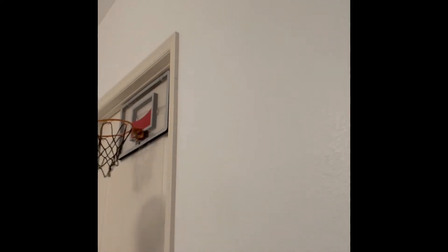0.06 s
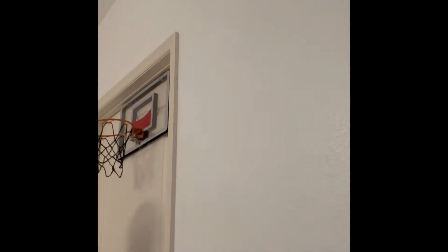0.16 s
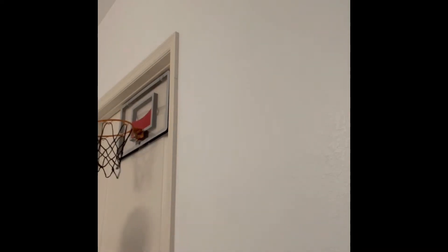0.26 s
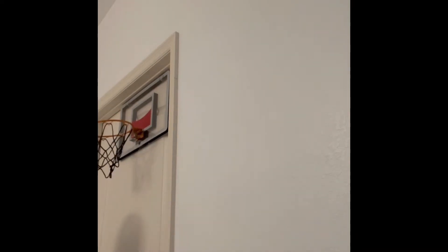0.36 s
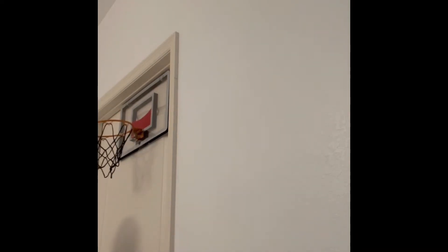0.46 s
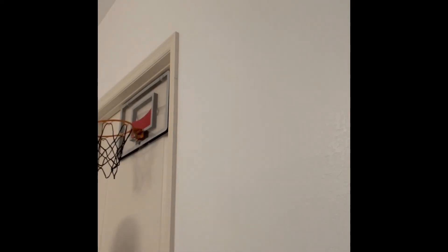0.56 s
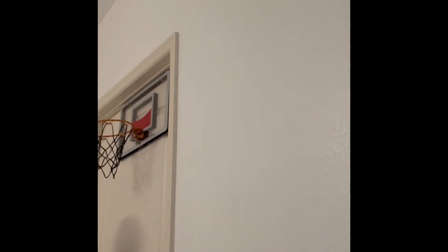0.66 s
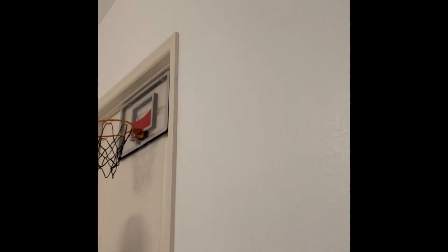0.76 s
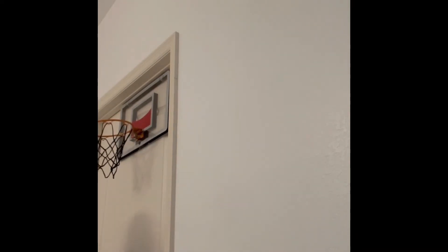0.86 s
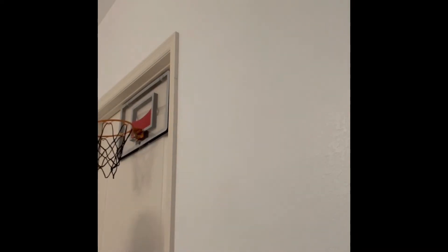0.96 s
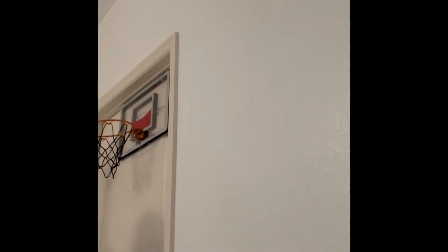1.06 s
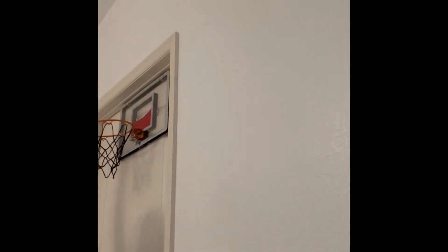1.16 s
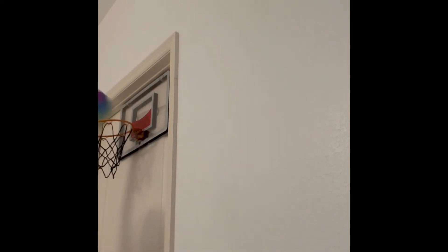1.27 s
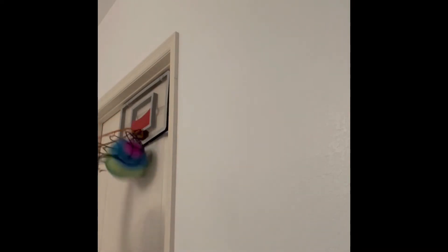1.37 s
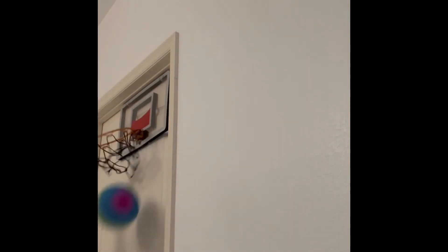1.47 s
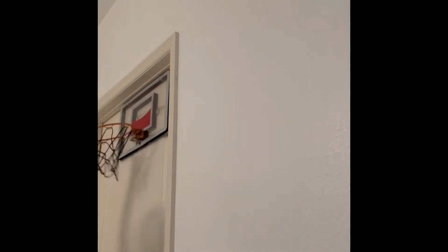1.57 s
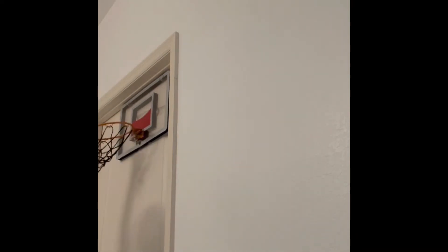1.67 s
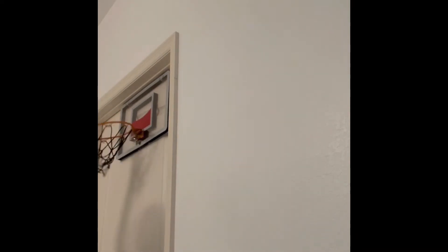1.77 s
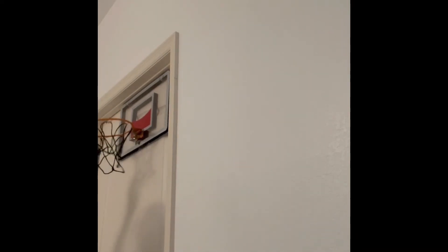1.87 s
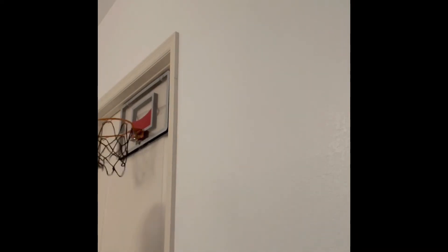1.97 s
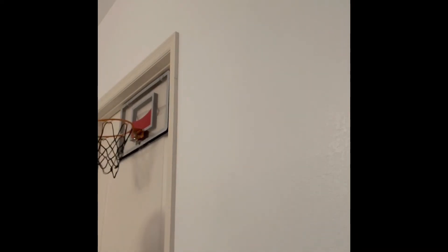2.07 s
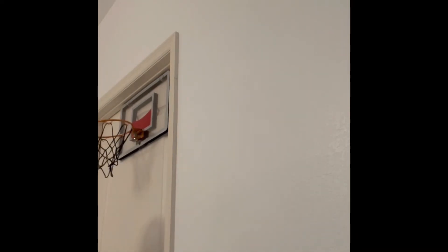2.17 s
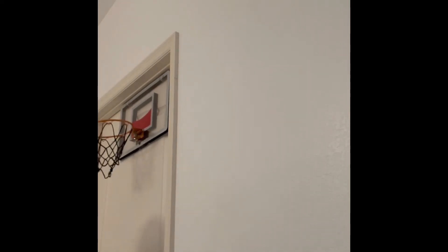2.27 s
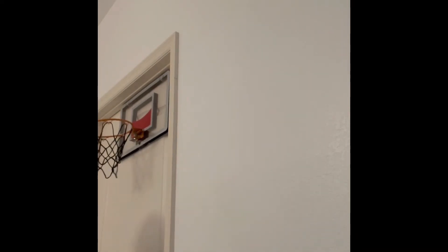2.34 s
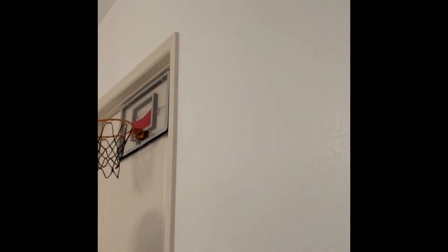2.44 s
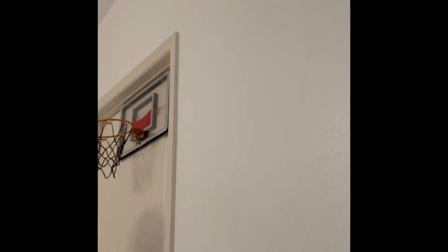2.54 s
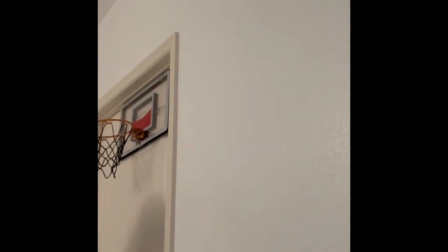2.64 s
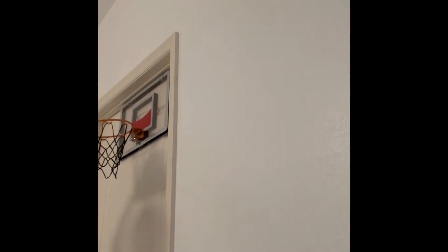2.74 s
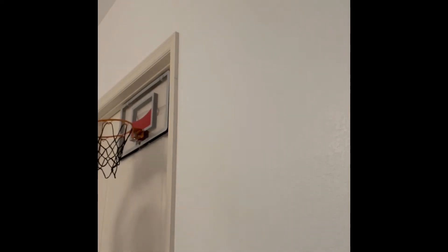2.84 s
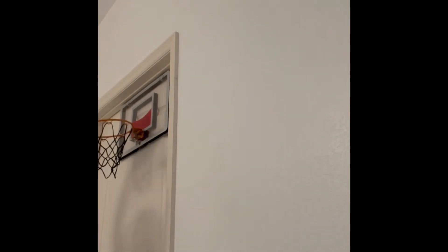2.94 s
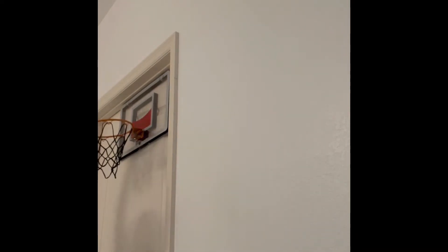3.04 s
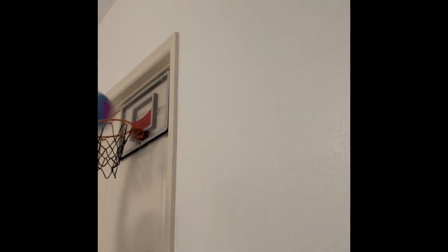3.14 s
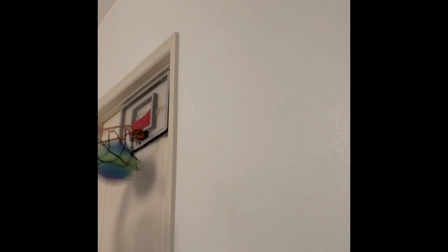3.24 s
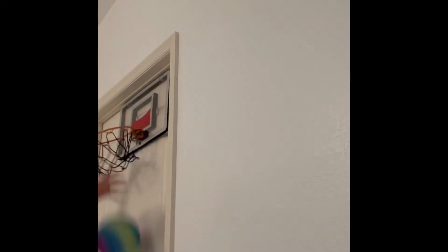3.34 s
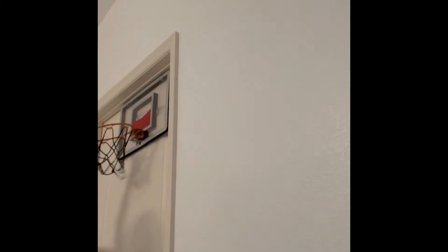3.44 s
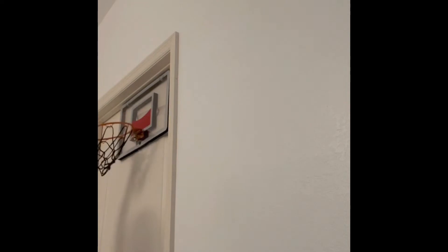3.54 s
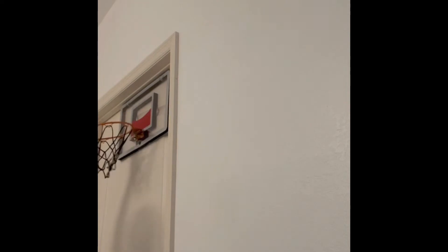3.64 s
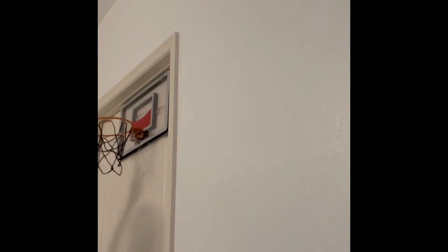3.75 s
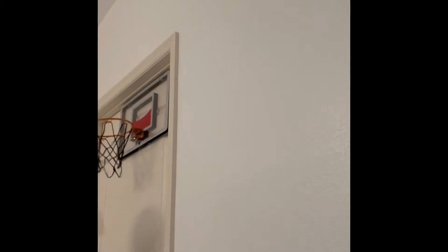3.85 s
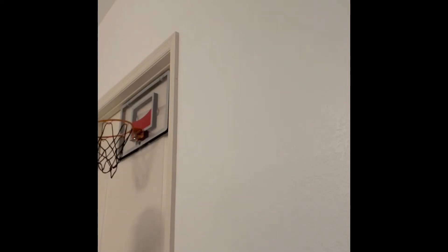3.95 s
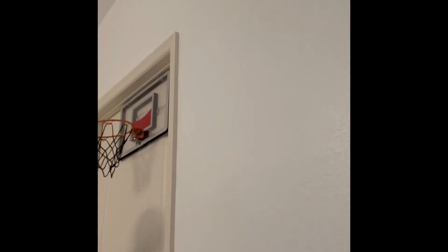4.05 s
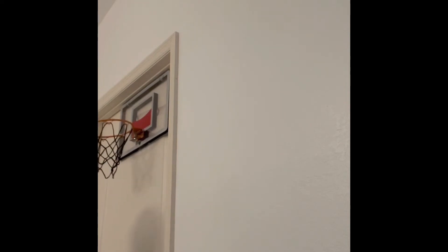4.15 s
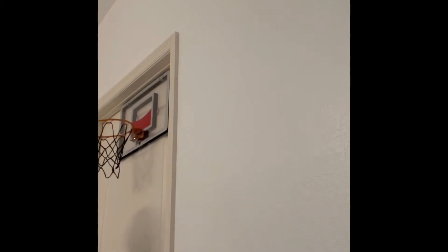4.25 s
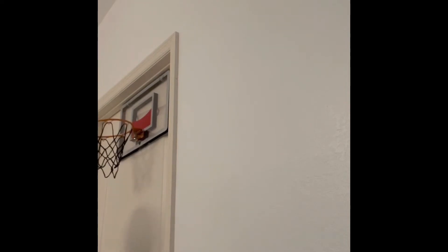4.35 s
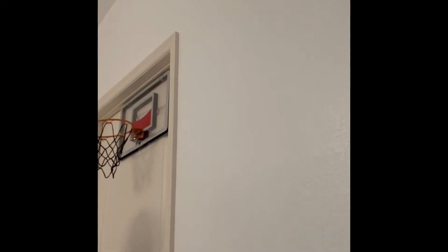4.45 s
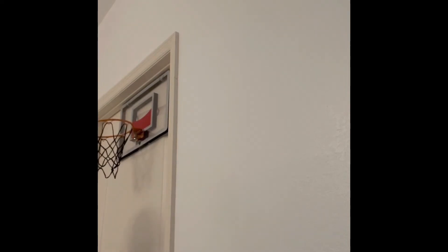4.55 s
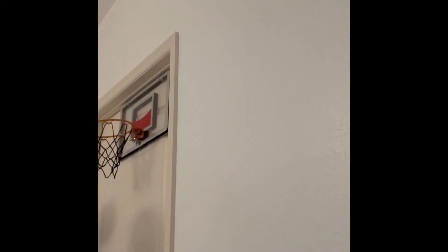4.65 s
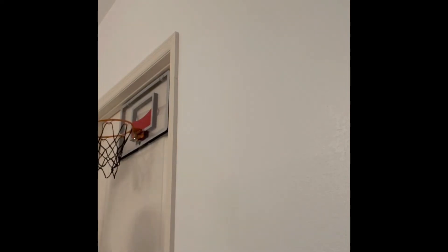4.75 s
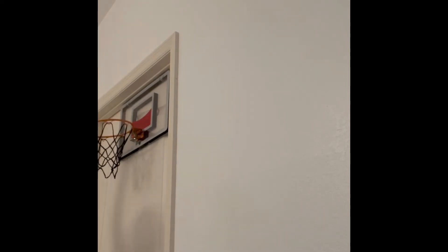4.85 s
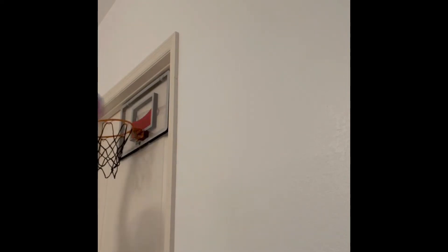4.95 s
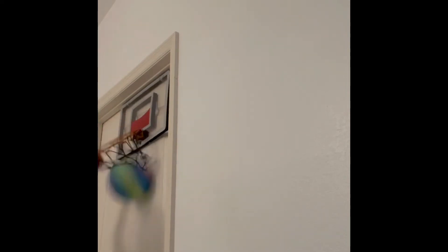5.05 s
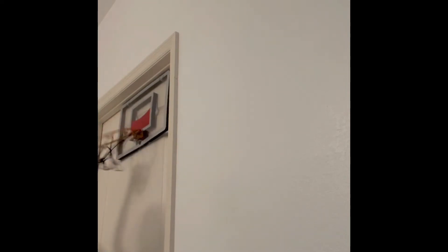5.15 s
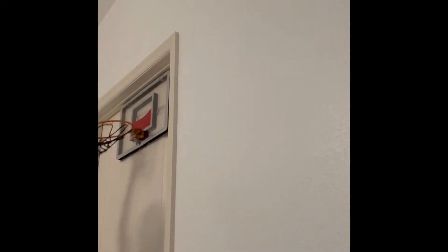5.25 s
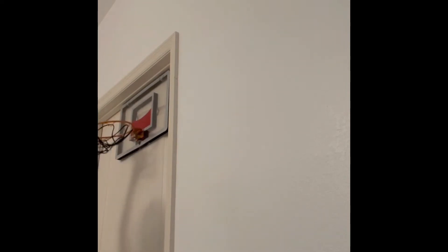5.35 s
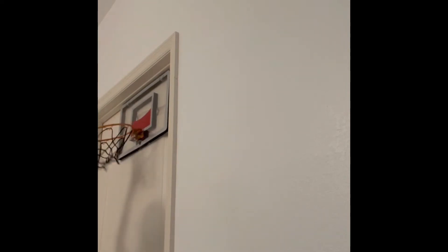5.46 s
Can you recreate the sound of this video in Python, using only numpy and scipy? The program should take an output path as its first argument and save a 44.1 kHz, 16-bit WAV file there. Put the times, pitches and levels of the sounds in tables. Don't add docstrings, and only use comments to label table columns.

```python
import sys
import numpy as np
from scipy import signal
from scipy.fft import rfft, irfft
from scipy.io import wavfile
from scipy.ndimage import uniform_filter1d

SR = 44100
rng = np.random.default_rng(int(sys.argv[2]) if len(sys.argv) > 2 else 0)


def volts(x):
    e = np.asarray(x, float) / 20
    return 10 ** e


def output_pcm(signal):
    pcm = np.clip(np.atleast_2d(signal).T, -1, 1) * 32767
    wavfile.write(sys.argv[1], SR, np.round(pcm).astype(np.int16))


N = 242991
LEAD = SR // 4
PLACES = 4


def response(spectrum, size):
    hz, db = np.transpose(spectrum)
    bins_hz = np.fft.rfftfreq(size, 1 / SR)
    return volts(np.interp(np.log(bins_hz + 1), np.log(hz), db))


def colour(x, spectrum):
    y = irfft(rfft(x) * response(spectrum, size=len(x)), len(x))
    return y / np.std(y)


def fade(t, t60):
    return np.exp(-np.log(1000) * t / np.maximum(t60, .002))


def walk(rate):
    k = int(SR / rate)
    held = np.repeat(rng.standard_normal(N // k + 1), k)
    return uniform_filter1d(held, k)[:N]


def ring(modes, scatter_db, push_ms, spread=0.036, tilt_db=0., start=0.):
    hz, db, t60 = np.transpose(modes)[:, :, None]
    t = np.arange(int(1.3 * SR * np.max(t60))) / SR
    luck = rng.standard_normal((2, len(modes), 1))
    gain = volts(db + scatter_db * luck[0] + tilt_db * np.log2(hz / 500))
    wave = np.sin(2 * np.pi * hz * (1 + spread * luck[1]) * (t + start))
    y = np.sum(gain * wave * fade(t, t60), axis=0)
    y = y * (1 - np.exp(-t * 1000 / push_ms))
    return y / np.max(np.abs(y))


def crack(spectrum, t60, tilt_db=0., rise_ms=0.017, patchy_db=2.2):
    size = 8192
    t = np.arange(size) / SR
    tilt = [(500, -2 * tilt_db), (10000, 2.3 * tilt_db), (13500, 1.3 * tilt_db)]
    gain = response(spectrum, size=size) * response(tilt, size=size)
    clumps = uniform_filter1d(rng.standard_normal(len(gain)), size=36)
    gain = gain * volts(patchy_db * 6 * clumps)
    rise = 1 - np.exp(-t * 1000 / rise_ms)
    y = rng.standard_normal(size) * fade(t, t60) * rise
    for _ in range(2):
        phase = np.angle(rfft(y))
        y = irfft(gain * np.exp(1j * phase), size) * fade(t, 4 * t60) * np.sqrt(rise)
    return y / np.sqrt(np.sum(y ** 2) / (SR * .004))


def add(tracks, k, s, sound):
    i = int(s * SR) + LEAD
    tracks[k % PLACES, i:i + len(sound)] += sound[:tracks.shape[1] - i]


# centre_hz, t60_s
ROOM_DECAY = [(60, 0.43), (125, 0.81), (250, 0.72), (500, 0.64), (1000, 0.75), (2000, 0.63), (4000, 0.6),
              (8000, 0.56), (14000, 0.33)]


def room(wet_db, build_ms):
    hz = np.log2(np.fft.rfftfreq(SR, 1 / SR) + 1)
    t = np.arange(SR) / SR
    noise = rfft(rng.standard_normal(SR))
    centres = np.log2(np.array(ROOM_DECAY)[:, 0])
    tail = 0
    for k, (_, t60) in enumerate(ROOM_DECAY):
        share = np.interp(hz, centres, np.arange(len(ROOM_DECAY)) == k)
        tail = tail + irfft(noise * share, SR) * fade(t, t60)
    tail = volts(wet_db) * tail * (1 - np.exp(-(t * 1000 / build_ms) ** 2))
    tail[0] = 1
    return tail


# freq_hz, density_db
ROOM_AIR = [(25, -8), (50, -0.5), (76, 5.5), (120, -9), (185, -16.5), (235, -11.5), (344, -17), (560, -17),
            (1130, -22), (2500, -30.5), (6000, -38), (16000, -42)]


def room_air():
    return volts(-47.5 - 1 + .8 * walk(4)) * colour(rng.standard_normal(N), ROOM_AIR)


# freq_hz, rms_db
HUM_TONES = [(575, -61), (1134, -71), (225, -68)]


def hum():
    t = np.arange(N) / SR
    return sum(volts(db + 4.0 + 1.5 * walk(2.6)) * np.sin(2 * np.pi * hz * t + 0.23 * walk(7.6))
               for hz, db in HUM_TONES)


# start_s, hold_s, level_db, fine_hiss_db
SLEEVES = [(0.397, 0.084, -62.5, -26), (0.642, 0.092, -51, -9), (1.116, 0.6, -56.5, -13.5),
           (2.36, .05, -58.5, -13), (2.542, 0.19, -62, -7), (2.795, 0.024, -59.5, -7.5),
           (3.14, .03, -62.5, -6.5), (4.252, 0.04, -67.5, -19), (4.747, 0.14, -60.5, -12.5)]


def sleeves():
    rise_db_s, fall_db_s = 148, 112
    t = np.arange(N) / SR
    s, hold, cloth_db, fine_db = np.transpose(SLEEVES)[:, :, None]
    before, after = np.maximum(s - t, 0), np.maximum(t - s - hold, 0)
    stroke = volts(cloth_db - rise_db_s * before - fall_db_s * after)
    weave = colour(rng.standard_normal(N), [(500, 0.5), (1500, -6), (2800, -0.5), (5200, -5.5),
                                            (7500, -7.5), (10000, -19.5)])
    fine = colour(rng.standard_normal(N), [(6000, -27.5), (8500, 1.5), (14000, -6.5), (16000, -4)])
    brush = stroke.sum(0) * weave + (stroke * volts(fine_db)).sum(0) * fine
    return volts(0.88 * walk(29)) * brush


# start_s, level_db, pitch_hz, t60_s
STEPS = [(0.654, -37.5, 110.5, 0.039), (.8, -43.5, 101, 0.07), (1.695, -50.5, 2780, 0.053),
         (1.725, -48, 2950, 0.05), (1.755, -50, 3000, 0.048), (1.784, -36.5, 1765, 0.025),
         (2.399, -53, 3180, .03), (2.445, -61, 4536, 0.023), (2.739, -42.5, 264.5, 0.028),
         (2.8, -44, 476, 0.032), (2.838, -54, 3900, 0.018), (3.89, -24.5, 96, 0.017),
         (1.786, -43, 9520, 0.019), (4.537, -53, 5120, 0.007), (4.6, -58.5, 13950, 0.0042),
         (4.745, -59, 3510, 0.007)]
# start_s, level_db, pitch_hz, t60_s
STRAY_RINGS = [(2.12, -54, 3745, .9), (3.965, -37, 183, .8), (3.99, -30, 371, .15), (4.035, -29, 373, .12),
               (2.105, -26, 258, .07)]


def player():
    out = np.zeros((PLACES, N + LEAD))
    for k, (s, db, hz, t60) in enumerate(STEPS + STRAY_RINGS):
        cluster = [(hz, 0, t60), (hz, -8, t60), (hz, -8, t60)]
        push_ms = min(t60 * 60, 8)
        add(out, k, s, volts(db) * ring(cluster, 3., push_ms, spread=.001 / t60))
    return out


# start_s, knock_db, clack_db, tick_db, loss_db_per_knock
BOARD_CHATTER = [
    (1.348, 3, -10, -32, 2.5),
    (3.211, -1, -20, -45, 4),
    (5.023, -8, -12.5, -26, 7.5),
]


def chatter():
    gap_s, gap_growth, hard_loss, scatter_db, knocks = .012, 1.18, 4.2, 2.5, 7
    rows = []
    for s, knock_db, clack_db, tick_db, loss_db in BOARD_CHATTER:
        k, luck = np.arange(knocks), rng.standard_normal((knocks, 3))
        times = s + np.cumsum(gap_s * gap_growth ** k) - gap_s
        loss = loss_db * k[:, None] * [1, hard_loss, hard_loss]
        db = np.array([knock_db, clack_db, tick_db]) - loss + scatter_db * luck
        rows += list(np.column_stack([times, db]))
    return rows


# start_s, door_knock_db, plastic_clack_db, steel_tick_db
CONTACTS = [(1.311, -7.5, -18.5, -38), (1.317, -9, -7.5, -35), (1.324, 0.5, -9, -14.5),
            (1.339, 2.5, -8, -17.5), (3.181, -6.5, -16.5, -32.5), (3.196, -1, -5.5, -21),
            (3.405, -35, -42.5, -32), (3.414, -29, -27, -34), (4.957, -13, -22, -43.5),
            (4.974, -18, -25, -49.5), (4.985, -12.5, -20, -22), (4.994, -9.5, -16, -22),
            (5.006, -2.5, -16, -49), (5.033, -5.5, -10, -26), (1.399, -7.5, -17.5, -28.5),
            (5.108, -16.5, -17, -34.5), (5.236, -17, -39, -50)]
# pitch_hz, level_db, t60_s
DOOR_MODES = [(198.7, -11.5, 0.12), (210, -16, 0.036), (266.1, -8, 0.067), (309.5, -4, 0.046),
              (339, -1, 0.039), (385.7, -3, 0.064), (435.2, -4, 0.048), (466, -9, 0.087), (533, 1.5, 0.034),
              (614, -8, 0.05), (652, -1.5, 0.03), (743, -8.5, 0.041), (826.3, -7.5, 0.055), (939, -6, 0.04),
              (1054, -12, 0.05), (1134, -21, 0.091), (1277.4, -15, 0.036), (1490, -19.5, 0.051),
              (1525, -12.5, 0.025)]
# pitch_hz, level_db, t60_s
RIM_MODES = [(2950, -3, .15), (3310, -4, .2), (3480, 0, .15), (4000, -6, .12), (5400, -13, .12),
             (7050, -4, .18), (7690, -8, .18), (8050, -5, .15), (8220, -2, .2), (9190, -6, .2),
             (9700, -6, .2), (12100, -12, .12), (13650, -6, .18), (14200, -5, .14), (14420, -8, .18)]
# freq_hz, density_db
PLASTIC_CLACK = [(300, -44.5), (700, -10.5), (1200, -2.5), (1900, -4.5), (2500, -4), (3200, -3), (3800, -8),
                 (4500, -11.5), (5400, -10), (6300, -17.5), (7200, -16), (8600, -34), (11000, -38),
                 (16000, -45)]
# freq_hz, density_db
STEEL_TICK = [(3000, -40), (6000, -16), (7100, -4), (8200, 0), (8800, -5), (9600, -2), (10600, -11),
              (12000, -10), (14000, -5), (16000, -13)]
# start_s, level_db
RIM_FREEDOM = [(1.3, -6.5), (3.2, -15.5), (5.0, -3.5)]


def hoop():
    out = np.zeros((PLACES, N + LEAD))
    for k, (s, knock_db, clack_db, tick_db) in enumerate(CONTACTS + chatter()):
        rim_db = np.interp(s, *np.transpose(RIM_FREEDOM))
        add(out, k, s, volts(knock_db - 7) * ring(DOOR_MODES, 2.94, 4.1))
        add(out, k, s, volts(clack_db - 9) * crack(PLASTIC_CLACK, 0.044, rise_ms=1.7))
        add(out, k, s, volts(tick_db - 7.5) * crack(STEEL_TICK, 0.07, rise_ms=0.55))
        add(out, k, s, volts(tick_db + rim_db) * ring(RIM_MODES, 4., .2, spread=.007))
    return out


# start_s, shove_db, swing_hz, swing_t60_s, rebound_after_s
LEAF_SHOVES = [
    (1.339, -13.5, 66.2, 0.32, .085),
    (3.196, -15.5, 60, 0.35, .067),
    (5.006, -21.5, 55.46, 0.9, 0.059),
]


def door_leaf():
    frame, leaf = np.zeros((PLACES, N + LEAD)), np.zeros((1, N + LEAD))
    for k, (first, shove_db, sway_hz, sway_t60, after) in enumerate(LEAF_SHOVES):
        for s, db in ((first, shove_db), (first + after, shove_db - 4)):
            add(frame, k, s, volts(db - 0.5) * ring([(116.1, -6, .16), (83.5, 1, 0.18)], 1.5, 5.9))
            add(leaf, 0, s, volts(db) * ring([(sway_hz, 0, sway_t60)], 0, 5.5, spread=0, start=s))
    return frame, leaf[0]


# pitch_hz, level_db, t60_s
FLOOR_MODES = [(186, -11.5, 0.13), (261, -14, 0.15), (297, -10, .06), (330.6, -1.5, 0.045),
               (364.7, 0.5, 0.092), (425.6, 0.5, 0.099), (433, -2.5, 0.067), (469.3, -4, 0.079),
               (530.7, -9.5, 0.15), (566, -13, 0.027), (604.3, -5, 0.075), (708, -5, 0.048),
               (760, -12.5, 0.05), (965, -6, 0.031)]
# pitch_hz, level_db, t60_s
BALL_AIR_MODES = [(1292, -1, 0.12), (1398, -9.5, 0.22), (1367, 1, 0.12), (1387, -1.5, 0.13),
                  (1470, -2.5, .18), (2085, -3, 0.14), (2200, -10, 0.096), (2210, -10.5, .12),
                  (2325, -18, 0.69), (2934, -17, 0.5), (3550, -20.5, 0.14), (4540, -20, .12)]
# freq_hz, density_db
SKIN_SLAP = [(300, -22.5), (480, 4), (1000, -1.5), (1500, -7.5), (2300, -8), (3500, -9.5), (5200, -12),
             (7000, -17.5), (16000, -28.5)]


def ball(blows, contact_s, rise_ms):
    boom_modes = [(57.9, -5.5, 0.28), (78.3, 3, 0.12), (122, -11.5, 0.25), (183.3, -15, 0.13)]
    out = np.zeros((PLACES, N + LEAD))
    for k, (s, thud_db, boom_db, skin_db, air_db, bright_db) in enumerate(blows):
        add(out, k, s, volts(thud_db) * ring(FLOOR_MODES, 2.3, 3.6))
        add(out, k, s, volts(boom_db) * ring(boom_modes, 3., 3.0, spread=0.01))
        add(out, k, s, volts(skin_db - 9.0) * crack(SKIN_SLAP, contact_s, bright_db, rise_ms))
        add(out, k, s, volts(air_db) * ring(BALL_AIR_MODES, 1.4, 2.0, spread=0.0073))
    return out


# start_s, thud_db, brush_after_s, brush_db, air_ring_db
HAND_CATCHES = [
    (0.127, -19, .006, -16.5, -33),
    (2.078, -19, 0.0093, -18, -33.5),
    (3.9593, -18.5, 0.00037, -19.5, -34),
]
# after_s, thud_db, boom_db, brush_db, air_db
CLOSING_GRIP = [(0, -5.5, -12, -7.5, -9), (0.012, -0.5, -14.5, -9, -0.5), (0.034, -5.5, -9, -6.5, -1),
                (0.054, -10, -11.5, -9, -5), (0.079, -7.5, -17, -7, -31)]


def catches():
    grip, palm = [], []
    for s, db, palm_after, brush_db, air_db in HAND_CATCHES:
        for after, thud, boom, brush, air in CLOSING_GRIP:
            grip.append((s + after, db + thud, db + boom, brush_db + brush, air_db + air, -1.2))
        palm.append((s + palm_after, db - 14, db - 26.5, brush_db - 6.5, air_db + 1.5, 2.5))
    return grip + palm


# freq_hz, density_db
FINGER_FIZZ = [(5000, -40), (10000, -20), (12500, -2.5), (15000, -0.5), (16000, -5)]


def fingers():
    out = np.zeros((PLACES, N + LEAD))
    for k, (s, _, _, brush_db, _, _) in enumerate(catches()):
        add(out, k, s, volts(brush_db - 23) * crack(FINGER_FIZZ, .12, rise_ms=1.8))
    return out


# start_s, level_db, boom_db, air_ring_db, brightness_db_per_octave
LANDINGS = [
    (-.16, -2.5, -0.5, -54, -3),
    (1.8004, 0.56, -1.5, 4, 2.8),
    (3.6325, 2.17, -2, 5, 2),
    (5.3646, 2.6, .3, 5, 2.9),
]
# after_s, thud_db, boom_db, slap_db,
# air_db
LANDING_STEPS = [(0, -7.5, -12, 2.74, -27), (.0056, -17, -21, -4.5, -22), (.012, -14, -11.5, -6.5, -26),
                 (.03, -9.5, -20.5, -9, -20)]


def landings():
    return [(s + after, db + thud, boom_db + boom, db + slap, air_db + air, bright_db)
            for s, db, boom_db, air_db, bright_db in LANDINGS
            for after, thud, boom, slap, air in LANDING_STEPS]


def scene():
    frame, leaf = door_leaf()
    held = ball(catches(), contact_s=0.11, rise_ms=1.5)
    leaf = leaf + volts(-6.5) * held.sum(0)
    spots = hoop() + frame + held + player() + fingers()
    near = leaf + sum(signal.fftconvolve(x, room(-30.0, 4.0))[:N + LEAD] for x in spots)
    slaps = ball(landings(), contact_s=0.045, rise_ms=0.044).sum(0)
    near = near + signal.fftconvolve(slaps, volts(2.5) * room(-32.0, 19.0))[:N + LEAD]
    return (near[LEAD:] + room_air() + hum() + sleeves())[None]


# freq_hz, gain_db
MIC_RESPONSE = [(25, -4.5), (45, 0), (7500, 0), (9000, -2), (10700, -4.5), (12000, -1), (14000, 3),
                (16000, -1.5)]


def microphone(x):
    cepstrum = irfft(np.log(response(MIC_RESPONSE, size=8192)))
    cepstrum[1:4096] *= 2
    cepstrum[4097:] = 0
    impulse = irfft(np.exp(rfft(cepstrum)))
    return signal.fftconvolve(x, impulse[None])[:, :N]


def roll_off(x):
    return signal.sosfilt(signal.butter(12, 16140, fs=SR, output="sos"), x)


def record(dry):
    x = microphone(dry)
    mix = x / (1 + np.abs(x / 1.02) ** 12) ** (1 / 12)
    return roll_off(mix)


dry = scene()
out = record(dry)
output_pcm(out)
```